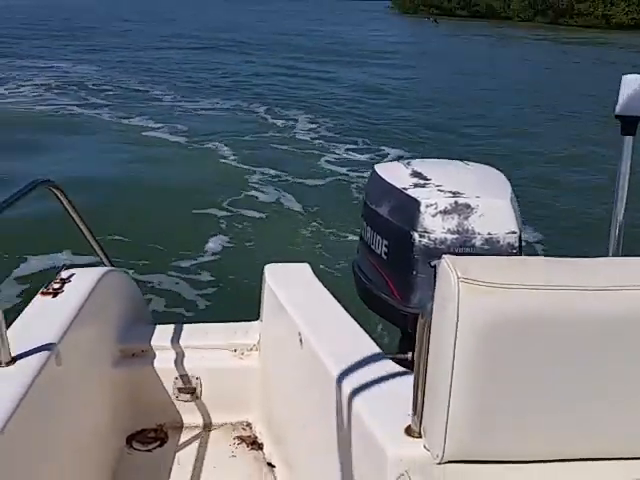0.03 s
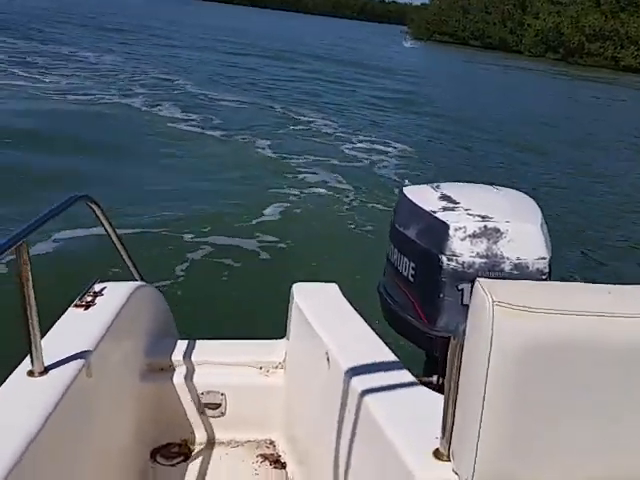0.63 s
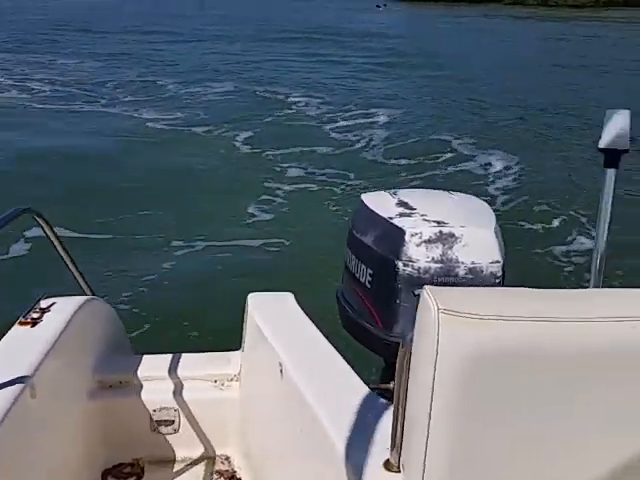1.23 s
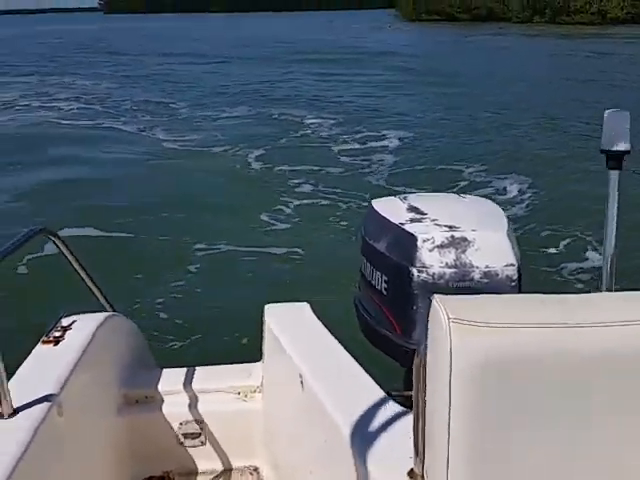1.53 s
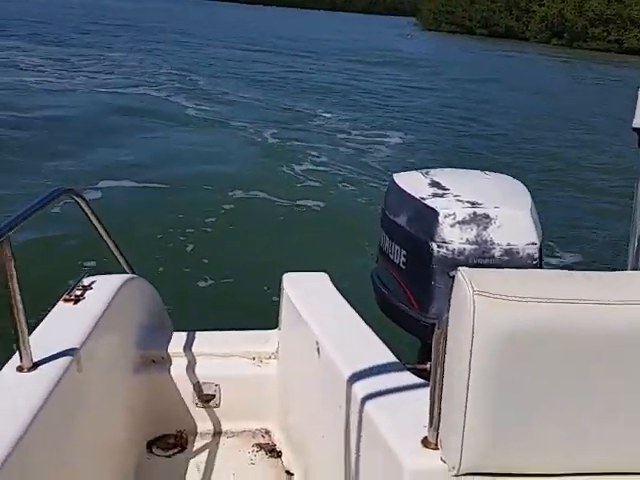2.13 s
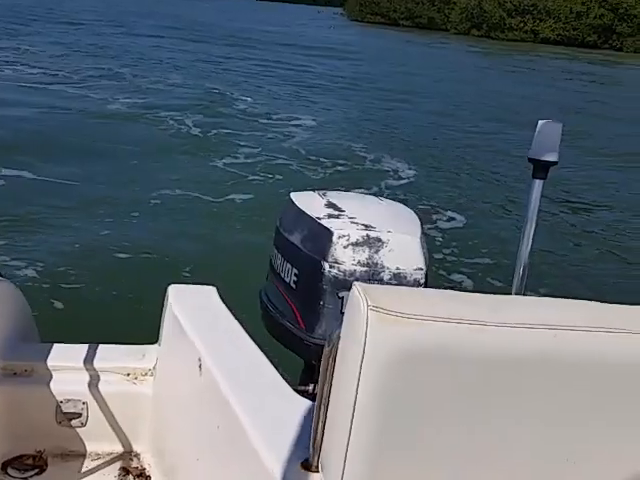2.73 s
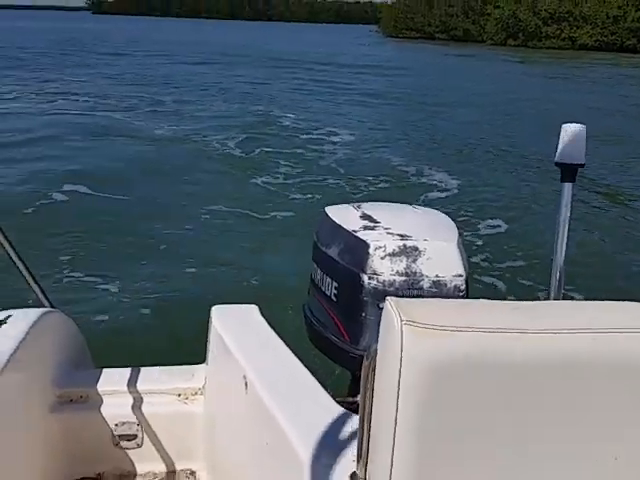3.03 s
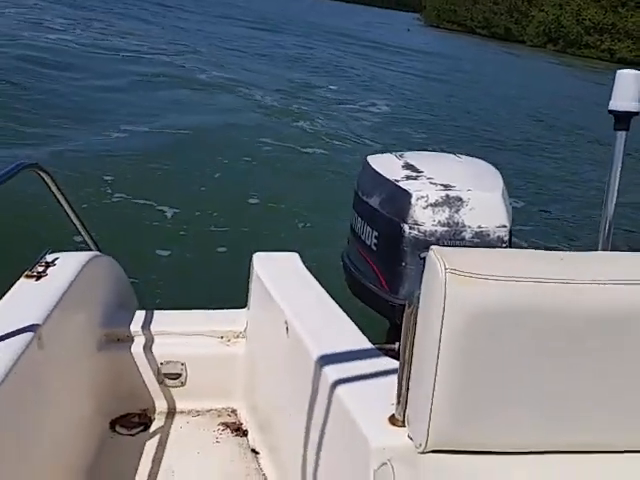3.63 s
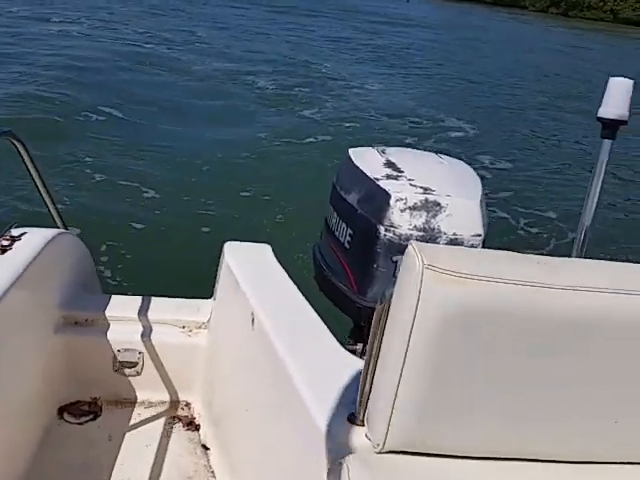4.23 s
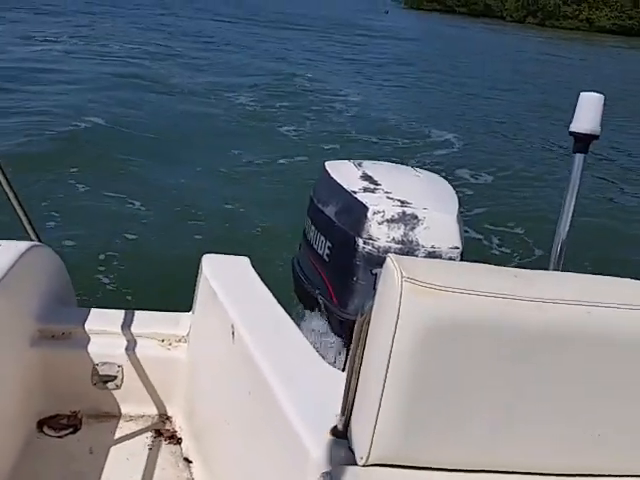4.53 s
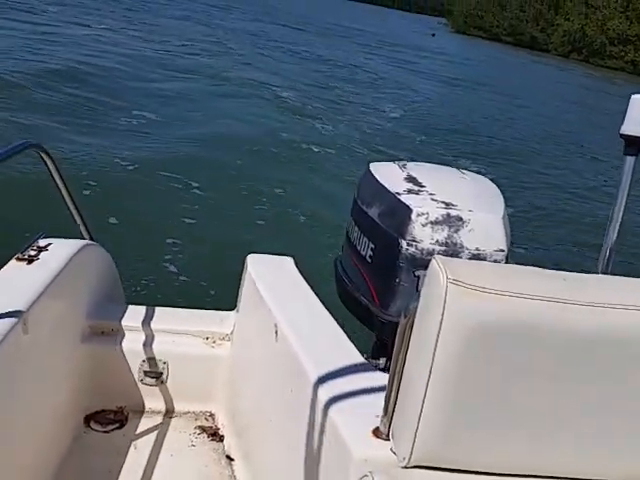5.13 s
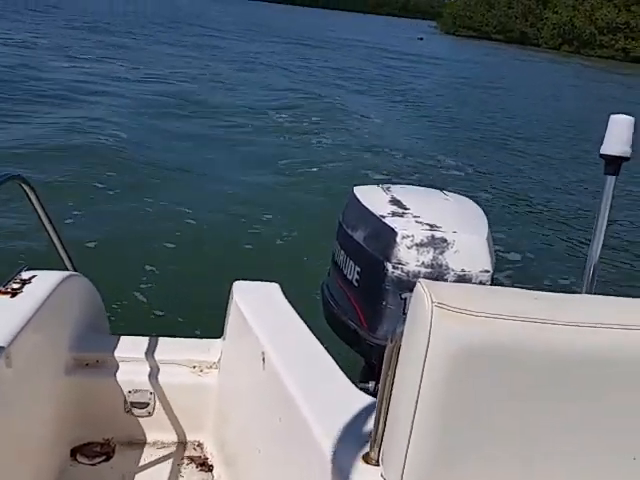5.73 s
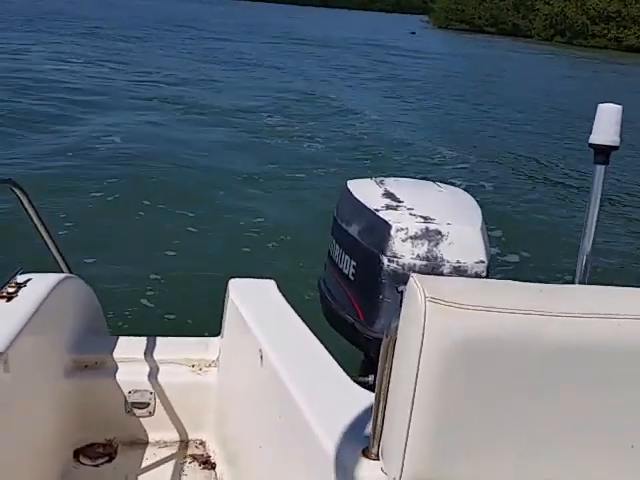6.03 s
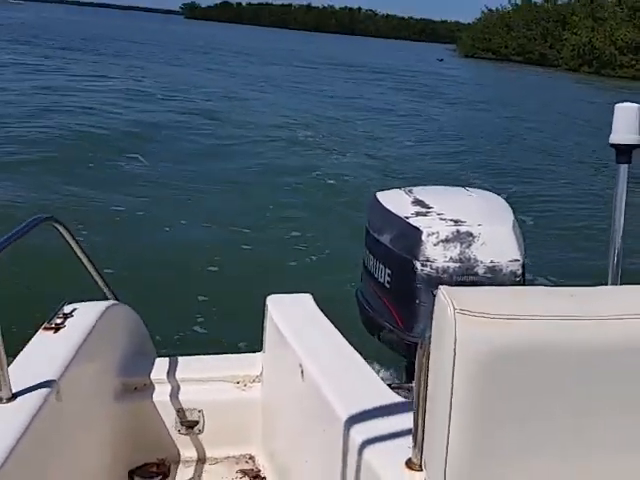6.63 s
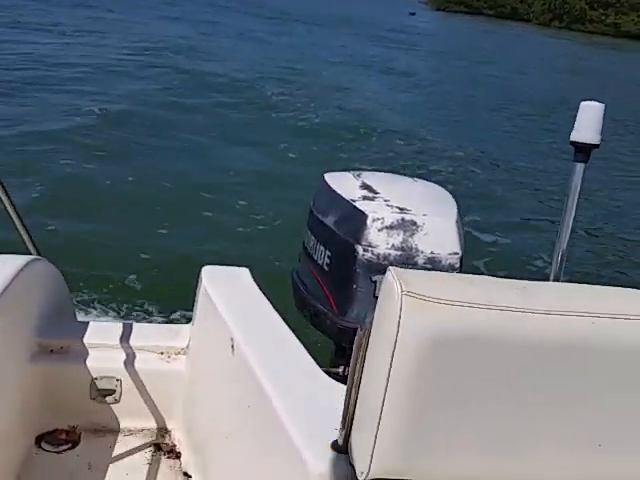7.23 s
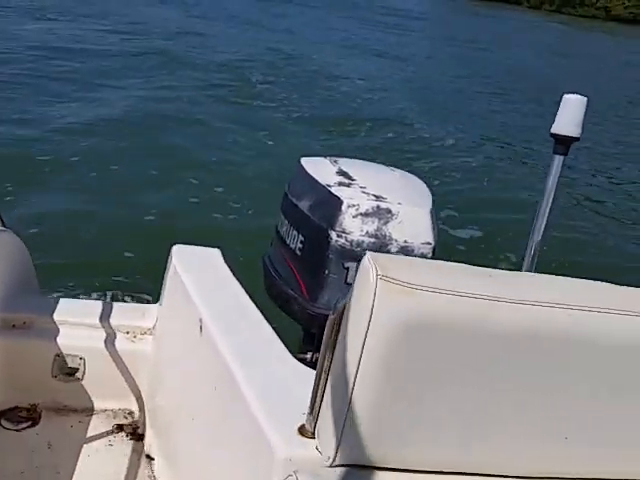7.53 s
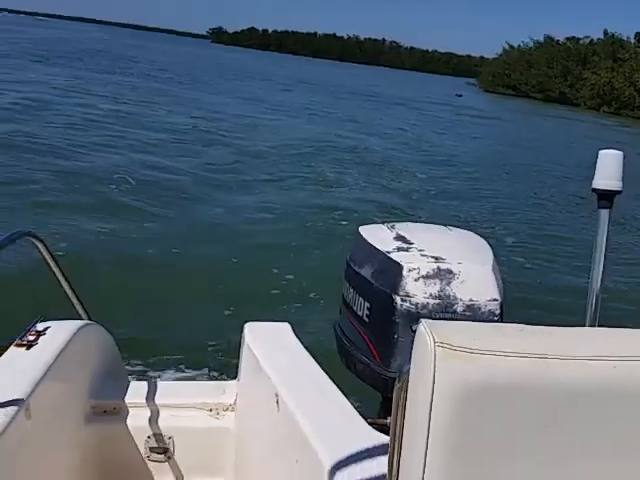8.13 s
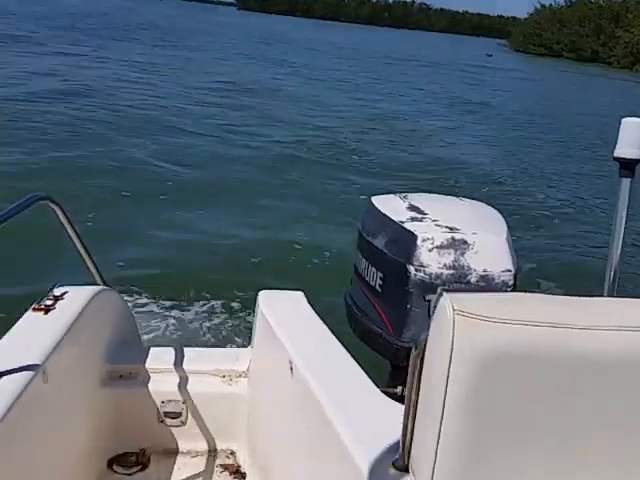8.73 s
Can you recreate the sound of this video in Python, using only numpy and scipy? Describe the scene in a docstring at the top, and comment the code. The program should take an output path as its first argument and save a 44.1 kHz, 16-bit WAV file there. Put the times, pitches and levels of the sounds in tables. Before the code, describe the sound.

On a small boat, a nearby outboard engine rumbles and gargles through its underwater exhaust, slightly to the left. Dull knocks, small metallic clicks and brief wind bumps on the microphone break into the idling. About three seconds in, the throttle opens to a deep, buzzing drone for a couple of seconds, then eases off. A second, slightly higher rev comes near the end. Soft foamy water wash lies underneath.

```python
"""In the cockpit of a small boat, a six-cylinder two-stroke outboard idles and is opened up twice.
Its firings form a periodic pulse train that excites the cowling and modulates the noise of the exhaust,
which burbles under water and booms under load. The wake hisses as a dense train of tiny bursts.
Loose gear knocks and ticks, setting hull and fittings into damped free vibration,
and puffs of wind buffet the right side of the microphone."""
import sys
import numpy as np
from scipy import signal
from scipy.fft import rfft, irfft, next_fast_len
from scipy.io import wavfile
from scipy.ndimage import uniform_filter1d, minimum_filter1d

SR = 44100
rng = np.random.default_rng(int(sys.argv[2]) if len(sys.argv) > 2 else 0)


def dump(signal):
    """Clip the signal to [-1, 1] and save it as 16-bit WAV at the path in sys.argv[1]."""
    limited = np.clip(np.atleast_2d(signal).T, -1, 1)
    pcm = np.round(limited * 32767).astype(np.int16)
    wavfile.write(sys.argv[1], SR, pcm)


N = 391166
TIME = np.arange(N) / SR


# throttle: opening t/s, closing t/s, target shaft f/Hz, effort rise/s, easing/(dB/s), relative note/dB
OPENINGS = [(2.85, 5.349, 27.15, 0.36, 3, -13), (7.798, 8.869, 29.93, 0.43, 10, -20)]

def throttle(idle_hz=12, spin_up_s=0.4, spin_down_s=0.3, release_s=0.44):
    """First-order lag: the shaft trails the throttle; effort peaks early, easing as the boat gains way."""
    shaft_hz, effort, note_gain = idle_hz, 0, 0
    for opens, closes, target_hz, rise_s, ease_db_per_s, note_db in OPENINGS:
        held, shut = np.clip(TIME - opens, 0, closes - opens), np.maximum(TIME - closes, 0)
        run_up = (1 - np.exp(-held / spin_up_s)) * np.exp(-shut / spin_down_s)
        shaft_hz += (target_hz - idle_hz) * run_up
        push = np.minimum(held / rise_s, 1) ** 2
        easing = undb(-ease_db_per_s * np.maximum(held - rise_s, 0))
        effort += push * easing * np.exp(-shut / release_s)
        note_gain += undb(note_db) * during([(opens,), (closes,)], fade_s=0.027)
    return shaft_hz, effort, note_gain


# strength of each cylinder, the two banks firing in turn: relative level/dB
CYLINDERS = [-8.5, -6, -3.5, -8.5, -1.5, -7]

def firings(turns, speed):
    """Impulse excitation: each firing is a click and a decaying pressure puff, more even at speed."""
    cycle = turns * len(CYLINDERS)
    count = cycle.astype(int)
    scatter_db = (2.5 - 1.5 * speed) * rng.standard_normal(N)[count]
    strength = undb(np.array(CYLINDERS)[count % len(CYLINDERS)] + scatter_db)
    clicks = unit(strength * np.diff(count, prepend=0))
    puffs = unit(strength * np.exp(-(cycle % 1)))
    return clicks, puffs


# water churning in the exhaust housing: f/Hz, width/Hz, relative level/dB
CHURN_BAND = [(133.3, 50, 0)]

def exhaust_note(turns, shaft_hz, drive, housing_hz=153.2, width_hz=13.9):
    """Forced resonance: the firing rate sweeps through the housing's mode; churned water adds waver."""
    firing_hz = len(CYLINDERS) * shaft_hz
    response = 1 / (1.5 + (2 * (firing_hz - housing_hz) / width_hz) ** 2)
    churn = unit(resonate(rng.standard_normal(N), CHURN_BAND)) * undb(-7)
    phase = 2 * np.pi * len(CYLINDERS) * turns + 0.56 * walk(30)
    tone = np.sin(phase) * undb(2.2 * walk(30))
    return np.sqrt(2) * drive * response * (tone + churn) * pan(left_db=5.5)


# exhaust overtones: multiple of the shaft rate, relative level/dB
HARMONICS = [(2, 0.5), (5, 6), (7, 2.5), (8, -1), (9, 6.5), (10, -1), (12, -1), (14, -7), (15, -4),
             (18, -7), (22, -10), (23, -15.5), (27, -14.5), (29, -15), (32, -18), (45, -22)]

def exhaust_buzz(turns, speed, effort):
    """Harmonic series: the firings merge into wavering overtones at multiples of the shaft rate."""
    buzz = 0
    for order, db in HARMONICS:
        drift = 2 * np.pi * rng.random() + 0.39 * walk(25)
        buzz += undb(db + 2.3 * walk(22)) * np.sin(2 * np.pi * order * turns + drift)
    return np.sqrt(2) * buzz * speed * between(-40.5, -31, effort) * pan(left_db=6)


# deep gliding exhaust tones under load, one list each: the first is a note near three times the shaft rate, the
# others are booms: t/s, f/Hz, level/dB
BOOM_GLIDES = [
    [(3.3, 66.3, -22), (3.372, 66.9, -17), (3.75, 79.3, -24.5), (3.854, 78.9, -20), (4.3, 78.3, -14)],
    [(4.42, 86.85, -12), (4.672, 88.23, -9.5), (5.194, 88.4, -13), (5.286, 82.9, -15.5),
     (5.39, 82.7, -14.5)],
    [(8.31, 77.3, -13.5), (8.412, 77.6, -11.5), (8.804, 84.5, -9.5), (8.87, 92, -16)],
]

def exhaust_booms():
    """Frequency modulation: each glide is a deep tone whose phase is the integral of its pitch."""
    booms = 0
    for rows in BOOM_GLIDES:
        hz, db = curve(rows)
        booms += during(rows, fade_s=0.078) * undb(db + 0.5 * walk(37)) * sine(hz)
    return np.sqrt(2) * booms * pan(left_db=5.5)


# exhaust gas breaking out of the water: t/s, level/dB
GAS_FLOW = [(0, -24), (1.3, -18), (2.6, -20), (3.4, -21), (4.15, -17), (5.1, -22.5), (6.0, -18), (6.8, -22),
            (7.7, -22), (8.1, -16), (8.87, -22)]
# spectrum of the gas: f/Hz, relative level/dB
GAS_SPECTRUM = [(12, -39), (22, -15), (50, -3), (85, -1), (130, -2), (175, -4), (250, -16.5), (380, -31),
                (600, -30.5), (1000, -44.5), (2000, -86)]
# largest gulps of exhaust: t/s, half-width/s, underwater level/dB, relief port level/dB
GAS_GULPS = [(0.14, 0.028, -26.5, -37), (0.668, 0.026, -15, -32), (1.088, 0.069, -40, -31),
             (1.356, 0.078, -28, -28.5), (1.734, 0.02, -23, -27), (2.395, 0.083, -19.5, -52),
             (3.113, 0.078, -25, -27.5), (3.878, 0.017, -14, -42), (4.413, 0.074, -26, -28),
             (6.377, 0.079, -29, -31.5), (7.1, 0.052, -27, -47), (8.27, 0.046, -32, -21)]

def burble(puffs, flutter_db=2.5):
    """Amplitude modulation: each firing pushes gas into the water, where it breaks up in gulps."""
    gas_db, = curve(GAS_FLOW)
    gas = unit(colour(pair(shared=0.76) * (1 + 1.2 * puffs), GAS_SPECTRUM))
    gulps = swells([(s, half_width, db) for s, half_width, db, _ in GAS_GULPS])
    return gas * (undb(gas_db + flutter_db * walk(20)) + gulps) * pan(left_db=8)


# relief port resonances: f/Hz, width/Hz, relative level/dB
PORT_MODES = [(242.6, 100.4, 6.5), (298.8, 128, -4), (386.5, 110, -12.5)]

def relief_port(puffs, effort, gargle_db=2.5):
    """Flow-excited resonance: exhaust gargles from a wet port above the waterline, harder with effort."""
    gargle = between(-32.5, -26.5, effort) * undb(gargle_db * walk(16))
    gulps = swells([(s, half_width, db) for s, half_width, _, db in GAS_GULPS])
    flow = pair(shared=0.79) * (1 + 0.6 * puffs)
    return unit(resonate(flow, PORT_MODES)) * (gargle + gulps) * pan(left_db=8)


# cowling resonances: f/Hz, width/Hz, relative level/dB
COWLING_MODES = [(391, 97, 6), (605, 149, 5.5), (699, 170, -4), (971, 69, -6), (1204, 180, -8)]

def cowling(clicks, puffs, speed, effort):
    """Forced vibration: the firings ring the modes of the engine cover."""
    force = undb(-5) * speed * clicks + (0.88 + 0.61 * puffs) * pair(shared=0.66)
    gain = between(-43.5, -32, effort) * undb(1.4 * walk(10))
    return unit(resonate(force, COWLING_MODES)) * gain * pan(left_db=11.5)


# air intake resonances: f/Hz, width/Hz, relative level/dB
INTAKE_MODES = [(1207, 99, -8), (1616, 260, 2.5), (2596, 410, -2.5), (4430, 2040, -21.5)]

def intake(clicks, puffs, effort):
    """Source and filter: pulsating air excites the intake's resonances, which snarl as it opens."""
    airflow = undb(-13.5) * clicks + puffs * pair(shared=0.53)
    return unit(resonate(airflow, INTAKE_MODES)) * between(-65, -44.5, effort ** 1.24) * pan(left_db=18)


# spectrum of the moving parts: f/Hz, relative level/dB
RASP_SPECTRUM = [(500, -33.5), (900, -16), (1400, -4), (1750, 1.5), (2000, 0), (2500, 3), (3000, -4.5),
                 (3500, -7.5), (4300, -16.5), (6000, -28.5), (9000, -53.5)]

def rasp(puffs):
    """Broadband machine noise: the moving parts rasp steadily, lightly modulated by the firings."""
    noise = unit(colour(pair(shared=0.12) * (1 + 0.25 * puffs), RASP_SPECTRUM))
    return noise * undb(-49.5 + 0.5 * walk(12)) * pan(left_db=15)


# blows of loose gear: t/s, relative blow level/dB, relative thump level/dB, main f/Hz, upper f/Hz
BLOWS = [(0.225, -38.5, -18.5, 570, 1420), (0.575, -27, -15.5, 703, 2720), (0.626, -23, -15, 574, 1640),
         (0.786, -28, -8.5, 657, 2490), (1.353, -43, -10.5, 503, 1630), (1.704, -29, -23, 540, 2100),
         (2.176, -32.5, -16, 514, 1630), (2.285, -24, -12, 548, 2580), (2.315, -25.5, -14, 486, 2530),
         (2.453, -37, -19.5, 703, 1620), (2.683, -34.5, -9, 685, 2050), (6.096, -33.5, -20, 1020, 2560),
         (6.314, -30.5, -27, 693, 2160), (7.824, -23.5, -10.5, 643, 1224), (7.868, -27.5, -12.5, 485, 1670)]
# spectrum of a dull blow: f/Hz, relative level/dB
CRACK_SPECTRUM = [(200, -8), (650, 0), (1200, -4), (1700, -3), (2700, -5), (3600, -21), (6000, -38),
                  (9000, -55)]
# modes of the hull and of the deck: f/Hz, relative level/dB, T60/s
HULL_MODES = [(87.2, 7.5, 0.32), (150, -9.5, 0.69), (232.3, -4.5, 0.11)]
DECK_MODES = [(391, 10, 0.15), (600, 3, 0.25), (700, 16, 0.029), (1154, -2.5, 0.081), (1650, -27, 0.1),
              (2630, -18, 0.09)]

def knocks(contact_s=0.00055, crack_s=0.014, swell_s=0.017, main_t60=0.18, upper_t60=0.082):
    """Impact excitation: a blow cracks, rings the panel it strikes and swells into a thump of the hull."""
    out, t = np.zeros((2, N)), TIME[:SR // 2]
    for s, db, thump_db, main_hz, upper_hz in BLOWS:
        crack = unit(colour(rng.standard_normal((2, len(t))), CRACK_SPECTRUM)) * np.exp(-t / crack_s)
        panel = ring(DECK_MODES + [(main_hz, 5, main_t60), (upper_hz, 1, upper_t60)], t)
        blow = (undb(-11.5) * panel + undb(-8) * crack) * (1 - np.exp(-t / contact_s))
        thump = ring(HULL_MODES, t) * (1 - np.exp(-t / swell_s))
        add(out, s, undb(db) * blow * pan(left_db=12.5))
        add(out, s, undb(thump_db - 3) * thump * pan(left_db=5))
    return out


# snaps of loose fittings: t/s, relative level/dB, ring gain/dB
SNAPS = [(0.298, -44, -11), (0.574, -53, 0), (0.738, -43, -19), (1.262, -47.5, -11), (1.706, -40.5, -12),
         (2.379, -44, -13), (2.393, -46, -10), (3.826, -43, -14), (5.345, -54, -22), (5.373, -38.5, -20),
         (5.697, -43, -16), (6.312, -30.5, -13), (7.82, -29.5, -21)]
# spectrum of a snap as heard: f/Hz, relative level/dB
SNAP_SPECTRUM = [(400, -8), (1000, -4), (2300, -3), (3700, -9), (5300, -1), (6500, -10), (8300, -13),
                 (11000, -1), (15500, -1)]
# modes of the metal fittings: f/Hz, relative level/dB, T60/s
FITTING_MODES = [(2200, -19, .05), (2620, -11, 0.033), (5040, 1.5, 0.082), (5200, 3.5, 0.066),
                 (10300, -6, .04)]

def ticks(contact_s=0.0078, tail_s=0.042):
    """Damped free vibration: small metal fittings snap, and some ring for a moment."""
    out, t = np.zeros((2, N)), TIME[:SR // 8]
    for s, db, ring_db in SNAPS:
        decay = np.exp(-t / contact_s) + 0.1 * np.exp(-t / tail_s)
        snap = unit(colour(rng.standard_normal((2, len(t))), SNAP_SPECTRUM)) * decay
        ringing = undb(ring_db) * ring(FITTING_MODES, t)
        add(out, s, undb(db - 3) * (snap + ringing) * pan(left_db=10))
    return out


# wind eddies: t/s, half-width/s, level/dB
EDDIES = [(0.104, .04, -41), (1.406, 0.025, -22), (1.516, 0.023, -20), (2.288, 0.1, -24),
          (2.631, 0.024, -20.5), (2.704, 0.035, -21.5), (5.996, 0.054, -21.5), (6.378, 0.087, -24.5),
          (6.756, 0.019, -24), (7.011, 0.024, -27)]
# spectrum of the buffeting: f/Hz, relative level/dB
WIND_SPECTRUM = [(12, -39), (25, -11), (50, -2), (90, 4), (200, 3.5), (400, -11), (600, -27.5),
                 (900, -30.5), (2000, -71.5)]

def wind(breeze_db=-32):
    """Turbulent pressure: a light breeze and its eddies buffet the microphone, mostly on the right."""
    rumble = unit(colour(pair(shared=0), WIND_SPECTRUM))
    gusts = undb(breeze_db) + swells(EDDIES)
    return rumble * gusts * undb(2 * walk(50)) * pan(left_db=-5.5)


# surges of the wake and splashes at the transom: t/s, half-width/s, level/dB
WAKE_SURGES = [(0.55, 0.66, -55.5), (2.0, .25, -61), (3.0, 0.77, -59), (3.75, .22, -50), (4.26, 0.32, -43),
               (5.5, 0.65, -56), (6.3, 0.45, -51.5), (7.95, 0.78, -49)]
WAVELETS = [(0.33, 0.022, -57), (0.5, 0.033, -57), (1.11, 0.037, -57.5), (2.98, 0.031, -57.5),
            (3.69, 0.048, -56), (8.08, 0.017, -52), (8.17, 0.013, -60)]
# foam hiss and splash, with the microphone's bright peak near 11 kHz: f/Hz, relative level/dB
FOAM_THROUGH_MIC = [(2060, -10.5), (3500, 1.5), (3950, -5), (4500, -4.5), (8300, -19.5), (9190, -16),
                    (10600, -3.5), (12100, -2.5), (13400, -6.5), (15100, -13), (15800, -9.5)]
SPLASH_THROUGH_MIC = [(1200, -21), (2700, 7), (3700, -3.5), (4900, -3.5), (6300, -11.5), (8300, -26),
                      (11500, -7), (15500, -21)]
# acoustic shadow on the foam's hiss at the right microphone port: f/Hz, gain/dB
RIGHT_SHADOW = [(4000, -20.5), (8000, -18), (12500, -14), (14000, -6), (15500, -0.5)]

def wake(burst_spread_db=2, foam_db=-56):
    """Incoherent addition: countless tiny unequal bursts sum to hissing foam and occasional splashes."""
    burst_sizes = np.minimum(rng.exponential(size=N), 3.5)
    bursts = undb(burst_spread_db * np.repeat(burst_sizes, 16)[:N])
    left, right = unit(colour(pair(shared=0.07) * bursts, FOAM_THROUGH_MIC))
    surge = (undb(foam_db) + swells(WAKE_SURGES)) * undb(1.1 * walk(12))
    foam = np.array([left, colour(right, RIGHT_SHADOW)]) * surge
    splashes = unit(colour(pair(shared=0.1) * bursts, SPLASH_THROUGH_MIC)) * swells(WAVELETS)
    return foam + splashes * pan(left_db=26.5)


# thin engine whistles: t/s, half-width/s, f/Hz, level/dB
WHISTLE_TONES = [(8.633, .17, 4470, -64), (8.763, 0.074, 7860, -70)]

def whistles(waver=0.003):
    """Slight frequency modulation: two faint tones waver on the engine near full speed."""
    tones = sum(swells([(s, half_width, db)]) * sine(hz * (1 + waver * walk(40)))
                for s, half_width, hz, db in WHISTLE_TONES)
    return tones * pan(left_db=8)


def undb(db):
    """Amplitude ratio of a level in decibels."""
    return 10 ** (np.asarray(db) / 20)


def unit(x):
    """Normalisation to rms 1."""
    return x / np.sqrt(np.mean(x ** 2))


def sine(hz):
    """Sinusoid whose phase is the integral of its frequency."""
    return np.sin(2 * np.pi * np.cumsum(hz) / SR)


def between(idle_db, open_db, effort):
    """Linear interpolation of gain from idle (effort 0) to full effort (1)."""
    return undb(idle_db) * (1 - effort) + undb(open_db) * effort


def curve(rows, ease_s=0.022):
    """Interpolation of each column of (t/s, ...) rows, with rounded corners."""
    s, *columns = np.transpose(rows)
    return [uniform_filter1d(np.interp(TIME, s, c), int(ease_s * SR)) for c in columns]


def during(rows, fade_s):
    """Trapezoidal envelope: 1 from the first row's time to the last, fading outside."""
    return np.clip(1 + np.minimum(TIME - rows[0][0], rows[-1][0] - TIME) / fade_s, 0, 1)


def swells(rows):
    """Sum of Gaussian envelopes: t/s, half-width/s at 1/e, level/dB."""
    return sum(undb(db) * np.exp(-((TIME - s) / half_width) ** 2) for s, half_width, db in rows)


def walk(rate_hz):
    """Slow random modulation of rms 1: held values, smoothed twice."""
    hold = int(SR / rate_hz)
    steps = np.repeat(rng.standard_normal(N // hold + 1), hold)
    return unit(uniform_filter1d(uniform_filter1d(steps, hold), hold)[:N])


def colour(x, points):
    """Spectral shaping by (f/Hz, gain/dB) points."""
    size = next_fast_len(x.shape[-1])
    hz, db = np.transpose(points)
    bins = np.arange(size // 2 + 1) * SR / size
    gain = undb(np.interp(np.log(bins + 1), np.log(hz), db))
    return irfft(rfft(x, size) * gain, size)[..., :x.shape[-1]]


def resonate(x, modes):
    """Parallel resonances, each two band-pass stages of the given width in cascade."""
    out = 0
    for hz, width, db in modes:
        b, a = signal.iirpeak(hz, hz / width, fs=SR)
        out += undb(db) * signal.lfilter(b, a, signal.lfilter(b, a, x))
    return out


def ring(modes, t):
    """Modal decay: each blow lands elsewhere, so the modes vary a little in weight and pitch."""
    return sum(undb(db + 0.86 * rng.standard_normal()) * np.exp(-np.log(1000) * t / t60)
               * np.sin(2 * np.pi * hz * (1 + 0.025 * rng.standard_normal()) * t)
               for hz, db, t60 in modes)


def pair(shared):
    """Partially coherent stereo noise with a given share of its power in common."""
    return np.sqrt(shared) * rng.standard_normal(N) + np.sqrt(1 - shared) * rng.standard_normal((2, N))


def pan(left_db):
    """Channel gains for a level difference, left over right."""
    return undb(np.array([[left_db], [-left_db]]) / 2)


def add(out, s, sound):
    """Superpose a sound starting at s seconds."""
    start = int(s * SR)
    out[:, start:start + sound.shape[-1]] += sound[..., :N - start]


def scene():
    """Superposition: the engine, its shaft turning unevenly at idle, sounds over wake, gear and wind."""
    shaft_hz, effort, note_gain = throttle()
    speed = (shaft_hz - shaft_hz.min()) / np.ptp(shaft_hz)  # 0 at idle, 1 at the fastest
    unevenness = 0.035 * (1 - speed) + 0.003
    turns = np.cumsum(shaft_hz * (1 + unevenness * walk(16))) / SR
    clicks, puffs = firings(turns, speed)
    exhaust = exhaust_note(turns, shaft_hz, note_gain * effort) + exhaust_buzz(turns, speed, effort)
    exhaust += exhaust_booms() + burble(puffs) + relief_port(puffs, effort)
    powerhead = cowling(clicks, puffs, speed, effort) + intake(clicks, puffs, effort) + rasp(puffs)
    return exhaust + powerhead + whistles() + wake() + knocks() + ticks() + wind()


def record(dry, ceiling=0.92, cutoff_hz=15780, fade_s=0.003):
    """Peak and band limiting: the loudest peaks are eased down and a steep low-pass cuts the top."""
    hold = SR // 50
    gain = ceiling / np.maximum(np.abs(dry).max(axis=0), ceiling)
    gain = uniform_filter1d(minimum_filter1d(gain, hold), hold)
    soft_ends = np.minimum(np.minimum(TIME, TIME[::-1]) / fade_s, 1)
    low_pass = signal.ellip(10, 0.2, 80, cutoff_hz, fs=SR, output="sos")
    return signal.sosfilt(low_pass, dry * gain * soft_ends)


dry = scene()
out = record(dry)
dump(out)
```